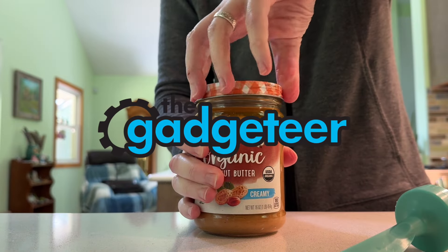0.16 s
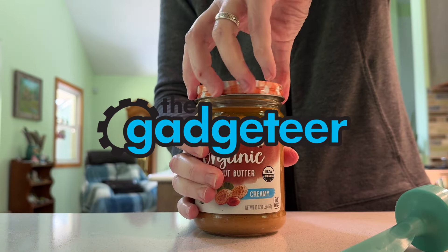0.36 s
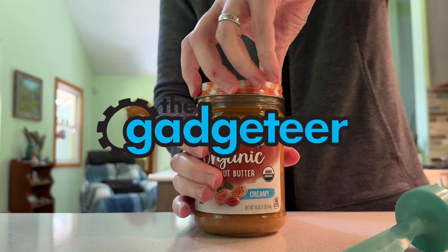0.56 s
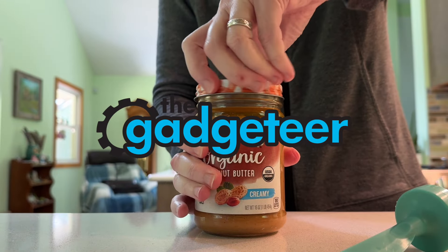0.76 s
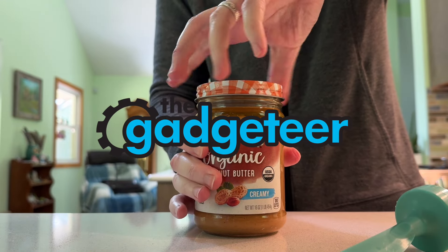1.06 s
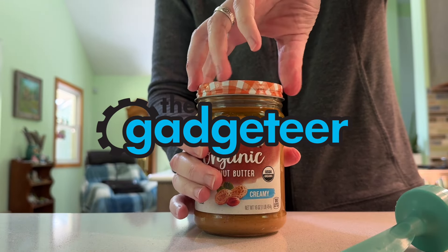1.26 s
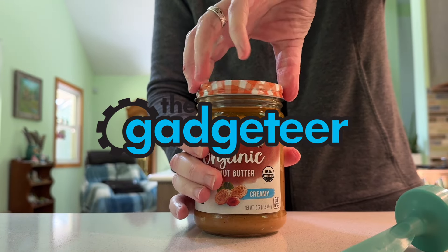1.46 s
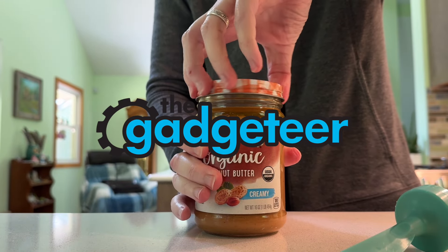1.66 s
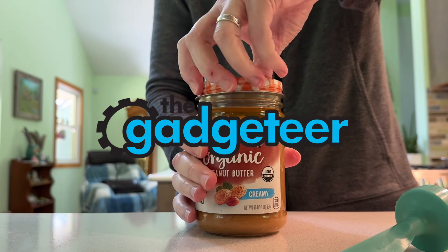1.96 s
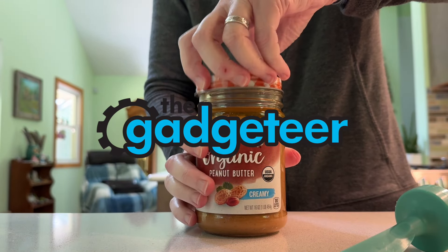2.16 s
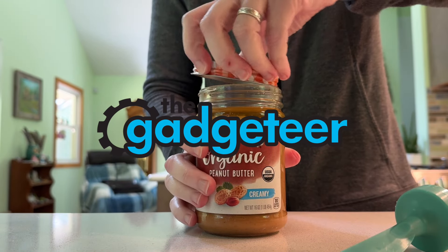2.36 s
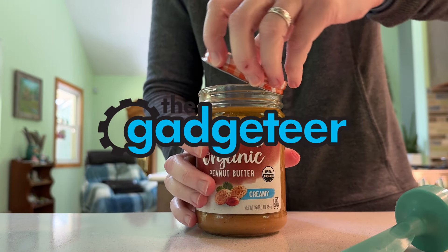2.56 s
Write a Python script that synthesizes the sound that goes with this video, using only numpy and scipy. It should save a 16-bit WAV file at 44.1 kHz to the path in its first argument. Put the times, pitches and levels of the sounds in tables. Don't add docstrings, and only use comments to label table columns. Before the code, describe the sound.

A sheet-metal lid is twisted off a full glass jar, heard close in a furnished room. Ticks and knocks start at 0.13 s, with short hollow scrapes until 0.9 s and soft counter thuds. Regripping taps come around 1.3 s, then stronger stick-slip grinding from 1.5 to 2.2 s. The lid clacks free at 2.4 s and drags faintly, over soft hush and a fading low rumble.

```python
import sys
import numpy as np
from scipy import signal
from scipy.fft import rfft, irfft
from scipy.io import wavfile
from scipy.ndimage import uniform_filter1d

SR = 44100
rng = np.random.default_rng(int(sys.argv[2]) if len(sys.argv) > 2 else 0)


def level_to_linear(level):
    exponent = np.asarray(level, float) / 20
    return 10 ** exponent


def bounce(signal):
    frames = np.transpose(np.atleast_2d(signal))
    limited = np.clip(frames, -1, 1)
    pcm = np.round(limited * 32767).astype(np.int16)
    wavfile.write(sys.argv[1], SR, pcm)


N = 119070
T = np.arange(N) / SR
LEFT_DB = -0.5

# pitch in Hz, level in dB.
HUSH_COLOUR = [(35, -9), (200, -5), (800, -10), (2000, -25), (2700, -42), (8500, -50), (10500, -40),
               (14000, -35)]
# time in seconds, level in dB.
RUMBLE_LEVEL = [(0, -63), (.4, -61), (.9, -64.5), (1.01, -66), (1.6, -75.5), (2.7, -84.5)]
# pitch in Hz, level in dB, time to fall 60 dB in seconds.
PANEL_TONES = [(766.3, -7, 0.082), (824.6, -1, 0.09), (899.5, -22, 0.044), (1173, -12.5, 0.046)]
# pitch in Hz, level in dB, time to fall 60 dB in seconds.
SKIRT_TONES = [(1290, -9, .04), (1550, -9, .04), (1700, -11, .04), (1850, -1, .07), (1945, 0, .07),
               (2420, -18, .035), (3190, -28, .025), (3950, -28, .02)]
# pitch in Hz, level in dB, time to fall 60 dB in seconds.
AIR_TONES = [(419.5, -10, 0.089), (456.2, -4, 0.059), (520.3, -6, 0.052), (614.6, -3, 0.056),
             (711.4, 0, .06)]
# pitch in Hz, level in dB, time to fall 60 dB in seconds.
LOOSE_TONES = [(413, -15, 0.1), (768, -4.5, 0.04), (1059, 3.5, 0.028), (1181, -0.5, 0.058),
               (1846, -6.5, 0.086), (2320, -10, 0.033), (3105, -20, 0.084), (3800, -35, 0.24),
               (4230, -28, 0.047), (4670, -28, 0.061)]
# pitch in Hz, level in dB, time to fall 60 dB in seconds.
FREE_TONES = [(751, 0, 0.012), (940, -11, 0.016), (1112, -7, 0.045), (1190, -11.5, 0.11), (1610, -1, 0.029),
              (1855, -3, 0.072), (2140, -16, 0.016), (2336, -20.5, 0.072), (3246, -23.5, 0.048),
              (3830, -10, 0.0055)]
# pitch in Hz, width in Hz, level in dB.
RIM_COLOUR = [(2940, 780, -7.5), (4107, 133, 0), (4620, 1600, -13), (6050, 1120, -7.5), (7400, 350, -5),
              (8310, 940, -7), (9800, 1880, 0), (10880, 580, 8), (11085, 885, 10), (11600, 1410, 8),
              (13650, 720, 3), (16200, 490, 1.5), (12800, 260, -31)]
# start in seconds, level in dB, length in seconds, top end in dB.
RIM_TICKS = [(0.128, -44, 0.0081, -1), (0.1352, -22, 0.0068, 4), (0.144, -30, 0.0058, -3),
             (0.377, -34.5, 0.0023, -2), (.5832, -41.5, 0.0046, 0), (.658, -47, 0.0012, 1),
             (.751, -32, 0.0027, -1), (0.8336, -31.5, 0.0018, 2), (0.9032, -26, 0.008, -4.5),
             (1.26, -36, 0.0033, -5.5), (1.316, -36.5, 0.0021, -2), (1.365, -53, .004, -9),
             (1.5202, -27.5, 0.0036, -4), (1.7867, -27.5, 0.0052, 3), (1.8917, -40.5, 0.0022, -2),
             (2.184, -47, 0.0094, -7), (2.235, -34, 0.0049, -11), (2.391, -39.5, 0.0055, -14),
             (2.613, -51, 0.0035, -16)]
# start in seconds, panel level in dB, skirt in dB against
# the panel, air in dB against the panel, rise in seconds.
LID_KNOCKS = [(.131, -26, -9.5, 0, 0.0021), (.137, -33.5, 2.5, 0, 0.0011), (.145, -27, -9, -8, 0.0034),
              (.255, -36.5, -8, -5, 0.00096), (.3755, -25.5, -3, 5, 0.0015), (.408, -41.5, -27, 11, .0012),
              (.484, -51, -15, 2, 0.00092), (.607, -39.5, -17, 10.5, 0.0011),
              (.657, -37.5, -11, 10.5, 0.0023), (.835, -28, 2, -8, 0.0016), (.905, -21.5, -3.5, 1, .0013),
              (1.26, -29.5, -3.5, -0.5, 0.0031), (1.313, -27.5, -8, 2, 0.0018),
              (1.364, -42.5, -4.5, 7, 0.00027), (1.478, -52, -9, 11, 0.0012),
              (1.5186, -21.5, -3.5, 0, 0.0014), (1.609, -27.5, -49, -14, 0.0031),
              (1.787, -29, -9.5, -9, 0.0033), (1.838, -36.5, -24, 5, 0.004),
              (2.052, -52.5, -26, 8.5, 0.0013), (2.191, -33, -12.5, -7, .001),
              (2.198, -37.5, -7, -10, 0.00067)]
# start in seconds, level in dB, rise in seconds.
LID_LIFTS = [
    (2.3909, -17, 0.0016),
    (2.61, -50, 0.0039),
]
# time in seconds, rubbing in dB, brightness in dB, hollowness in dB.
WRIST_TURNS = [
    [(0.17, -55.5, 12, -7), (0.178, -66, -22, -5), (0.238, -58, -12, 3), (0.25, -52, -21, -6),
     (0.328, -44.5, 0.5, -9), (0.36, -41.5, -8, 2), (0.375, -34, -15, 0.5)],
    [(0.42, -61.5, -2, 15), (0.462, -60, -23, 14), (0.592, -50, -9, 6.5), (0.622, -43.5, -9.5, 3),
     (0.64, -54.5, -10, 15)],
    [(0.64, -67, 3, 20), (0.666, -48.5, -4, 11), (0.688, -47, -13.5, 0), (0.72, -39.5, -7.5, 2.5),
     (0.78, -44, -8.5, 5), (0.825, -48.5, -6, -3), (0.85, -40, -2, -15), (0.885, -44.5, -3, -12),
     (0.903, -51.5, -19, 0)],
]
# time in seconds, rubbing in dB, brightness in dB, hollowness in dB.
REGRIP_TURNS = [
    [(1.47, -63.5, -17, 7), (1.51, -47, -14, -3.5), (1.52, -42.5, -14, 16.5)],
    [(1.535, -49, -7, 2), (1.57, -47, -19, -1.5), (1.613, -33.5, -14.5, -12), (1.64, -38.5, -12.5, -11),
     (1.663, -48.5, -3, -3), (1.697, -34.5, -12, -9), (1.715, -43.5, 1, -5), (1.745, -37, -7, -8),
     (1.77, -38, -6.5, -17)],
    [(1.77, -37, -16, 2.5), (1.792, -32, -12.5, -2), (1.815, -45, -16, -16), (1.833, -46.5, -14, -9),
     (1.85, -36, -11.5, -3), (1.875, -42, -17.5, 1), (1.9, -46.5, -7.5, -4), (1.91, -59.5, -15, 2),
     (1.96, -58.5, -20, 5.5)],
    [(2.035, -78, -27, 17), (2.06, -57.5, -14, 7), (2.09, -56, -20, 10), (2.13, -41, -16, -2.5),
     (2.155, -48.5, -10.5, -6), (2.175, -50, -13, 2), (2.19, -47, -12, -24), (2.215, -54, -5.5, -16),
     (2.234, -52, 3, -13)],
]
# time in seconds, level in dB.
MOUTH_DRAG = [(2.4, -60), (2.43, -58), (2.48, -50), (2.55, -71), (2.62, -66.5)]
# start in seconds, jar hum in dB, counter thud in dB.
JAR_SHIFTS = [(0.378, -61, -46), (0.851, -52, -44), (0.92, -53, -51), (1.303, -60.5, -62),
              (1.529, -60.5, -53), (2.449, -64, -80)]


def unit(x):
    return x / np.sqrt(np.mean(x ** 2) + 1e-18)


def ring(x, hz, t60):
    decay = np.log(1000) / (t60 * SR)
    return signal.lfilter([1], [1, -np.exp(2j * np.pi * hz / SR - decay)], x).imag


def band(x, hz, width):
    return signal.lfilter(*signal.iirpeak(min(hz, .45 * SR), hz / width, SR), x)


def walk(rate):
    k = int(SR / rate)
    steps = np.repeat(rng.standard_normal(N // k + 1), k)
    return unit(uniform_filter1d(uniform_filter1d(steps, k), k)[:N])


def curve(rows, col):
    rows = np.array(rows)
    return np.interp(T, rows[:, 0], rows[:, col])


def add(out, x, at):
    i = int(at * SR)
    out[i:i + len(x)] += x[:N - i]


def strike(tones, rise):
    hz, db, t60 = np.array(tones).T[:, :, None]
    t = T[:SR // 4]
    level_luck, pitch_luck, phase_luck = rng.standard_normal((3, len(tones), 1))
    swing = np.sin(2 * np.pi * hz * (1 + .01 * pitch_luck) * t + .4 * phase_luck)
    x = level_to_linear(db + 2.2 * level_luck) * swing * np.exp(-np.log(1000) * t / t60)
    x = x.sum(axis=0) * (1 - np.exp(-(t / max(rise, 1e-4)) ** 2))
    x = x * (1 + 3.4 * np.exp(-t / 0.015))
    return x / np.abs(x).max()


def hush():
    hz, colour = np.arange(N // 2 + 1) * SR / N + 1, np.array(HUSH_COLOUR)
    shape = level_to_linear(np.interp(np.log(hz), np.log(colour[:, 0]), colour[:, 1]))
    shape = shape / (1 + (hz / 14600) ** 40)
    mid, side = unit(irfft(rfft(rng.standard_normal((2, N))) * shape, N))
    side = signal.lfilter(*signal.butter(1, 250, "high", fs=SR), side)
    air = level_to_linear(-65.5) * (mid + side * np.array([[1], [-1]]))
    whine = level_to_linear(-97.5) * np.sin(2 * np.pi * 6620 * T)
    rumble = unit(band(rng.standard_normal(N), 139, 77))
    rumble = rumble * level_to_linear(curve(RUMBLE_LEVEL, 1) + 0.28 * walk(3.35))
    return whine + air + rumble * level_to_linear(np.array([[LEFT_DB], [-LEFT_DB]]) / 2)


def rim(x, top_db=0):
    out = 0
    for k, (hz, width, db) in enumerate(RIM_COLOUR):
        out = out + (-1) ** k * level_to_linear(db + top_db * (hz > 7000)) * band(x, hz, width)
    return out


def ticks():
    out, t = np.zeros(N), T[:SR // 10]
    for at, db, length, top_db in RIM_TICKS:
        burst = t ** 2 * np.exp(-t / max(length, 2e-4) * 3)
        x = rim(rng.standard_normal(len(t)) * burst, top_db)
        add(out, level_to_linear(db) * x / np.abs(x).max(), at - .0015)
    return out


def knocks():
    out = np.zeros(N)
    for at, db, skirt_db, air_db, rise in LID_KNOCKS:
        air = strike([(hz, g - 5 * (hz < 660), t60) for hz, g, t60 in AIR_TONES], rise)
        lid = strike(PANEL_TONES, rise) + level_to_linear(skirt_db) * strike(SKIRT_TONES, rise)
        add(out, level_to_linear(db) * (lid + level_to_linear(air_db) * air), at)
    add(out, level_to_linear(-26) * strike(LOOSE_TONES, 0.0033), 2.2345)
    for at, db, rise in LID_LIFTS:
        add(out, level_to_linear(db) * strike(FREE_TONES, rise), at)
    return out


def grains():
    hit = (rng.random(N) < 3000 / SR) * np.sign(rng.standard_normal(N))
    return hit * level_to_linear(2.5 * rng.exponential(size=N) + 2 * walk(70))


def rubbed(tones, x):
    y = 0
    for hz, db, t60 in tones:
        tone = band(band(ring(x, hz, t60), hz, hz / 3), hz, hz)
        y = y + level_to_linear(db + 3 * walk(12.14)) * unit(tone)
    power = uniform_filter1d(uniform_filter1d(y ** 2, size=2000), size=2000)
    return y / np.sqrt(power + 1e-9)


def slide(x):
    drift = walk(9)
    return np.interp(T + np.cumsum(.045 * (drift - drift.mean())) / SR, T, x)


def threads():
    out, x = np.zeros(N), grains()
    air, panel = slide(rubbed(AIR_TONES, x)), rubbed(PANEL_TONES, x)
    skirt = rubbed(SKIRT_TONES[:-2], x)
    grit = unit(rim(x + 4.2 * rng.standard_normal(N)))
    for rows in list(WRIST_TURNS) + list(REGRIP_TURNS):
        on = uniform_filter1d(1. * ((T > rows[0][0]) & (T < rows[-1][0])), size=400)
        bright = level_to_linear(curve(rows, 2)) * (skirt + level_to_linear(-13) * grit)
        hollow = level_to_linear(curve(rows, 3)) * air
        out = out + on * level_to_linear(curve(rows, 1)) * (panel + hollow + bright)
    on = (T > MOUTH_DRAG[0][0]) & (T < MOUTH_DRAG[-1][0])
    free = rubbed(np.array(FREE_TONES) * [1, .5, .45], grains())
    scrape = unit(rim(rng.standard_normal(N), -10))
    return out + on * level_to_linear(curve(MOUTH_DRAG, 1)) * (free + level_to_linear(-12) * scrape)


def counter():
    out = np.zeros(N)
    for at, hum_db, thud_db in JAR_SHIFTS:
        hum = strike([(240.8, 0, 0.58)], 0.0081)
        thud = strike([(101, 0, 0.086), (170, -3, .1)], 0.0014)
        add(out, level_to_linear(hum_db + 6.5) * hum + level_to_linear(thud_db + 1.5) * thud, at)
    return out


def room(x):
    t, noise = T[:SR // 2], rng.standard_normal((3, 2, SR // 2))

    def fall(t60):
        return np.exp(-np.log(1000) * t / t60) * (t > .002) / np.sqrt(t60 * SR / (2 * np.log(1000)))

    low = signal.lfilter(*signal.butter(2, 2500, fs=SR), noise[0]) * 3
    high = signal.lfilter(*signal.butter(2, 2500, "high", fs=SR), noise[1])
    tail = level_to_linear(-18.5) * (low * fall(0.49) + level_to_linear(7) * high * fall(0.48))
    early = level_to_linear(-2) * noise[2] * fall(0.021)
    return signal.fftconvolve(tail + early, x[None], axes=1)[:, :N]


def scene():
    low_cut = signal.butter(6, 385, "high", fs=SR, output="sos")
    lid = signal.sosfilt(low_cut, ticks() + knocks() + threads()) + counter()
    late = np.interp(T - .00004, T, lid)
    ears = np.array([lid, late]) + room(lid)
    return ears * level_to_linear(np.array([[LEFT_DB], [-LEFT_DB]]) / 2) + hush()


def low_pass(x):
    return signal.sosfilt(signal.butter(12, 16440, fs=SR, output="sos"), x)


def record(dry):
    hz = np.arange(N // 2 + 1) * SR / N
    s = rfft(dry) / (1 + (hz / 15400) ** 40) / (1 + (48 / (hz + 1)) ** 4)
    top = np.clip((hz - 7200) / 600 + .5, 0, 1)
    lag = 2 * np.pi * (hz - 8000) / 3100
    turn = np.exp(.5j * (lag + .55 * np.sin(lag)) * np.array([[-1], [1]]))
    heard = irfft(s * (1 - top) + s[0] * top * turn, N)
    return low_pass(heard)


dry = scene()
out = record(dry)
bounce(out)
```